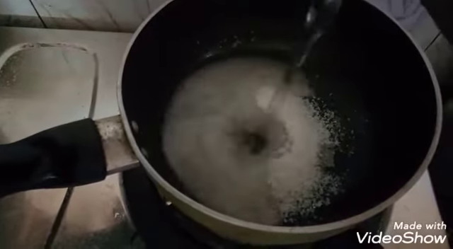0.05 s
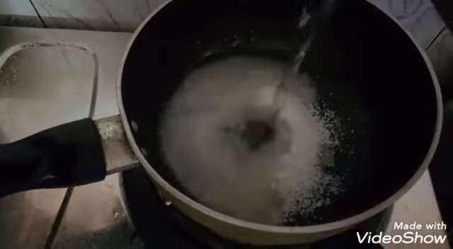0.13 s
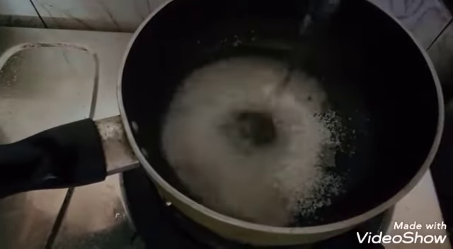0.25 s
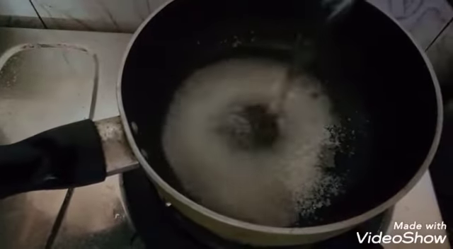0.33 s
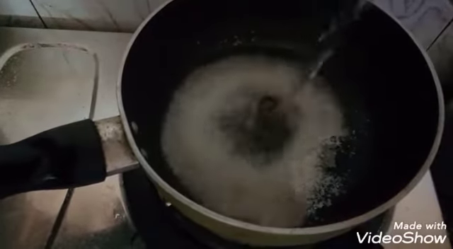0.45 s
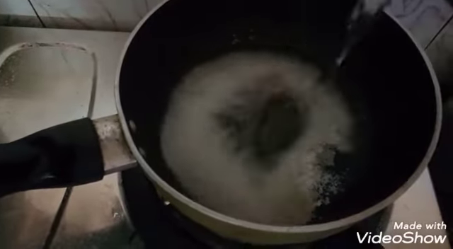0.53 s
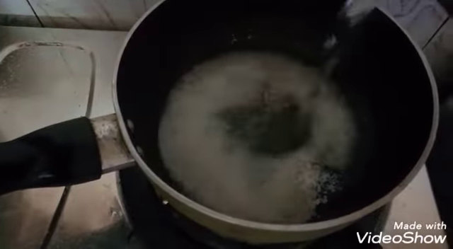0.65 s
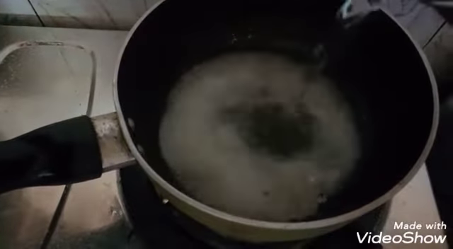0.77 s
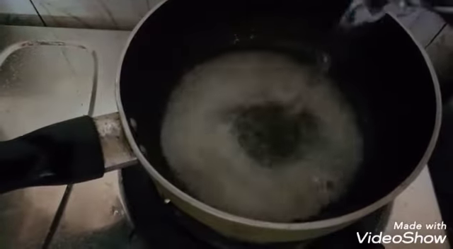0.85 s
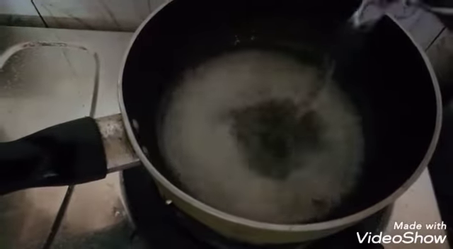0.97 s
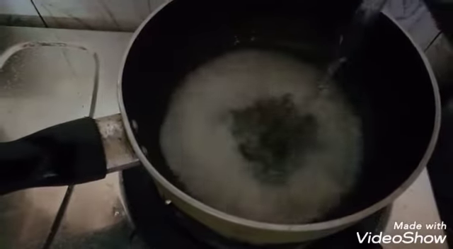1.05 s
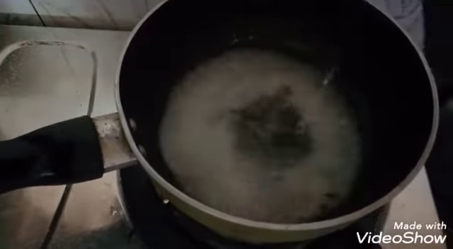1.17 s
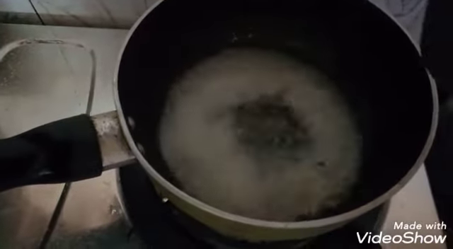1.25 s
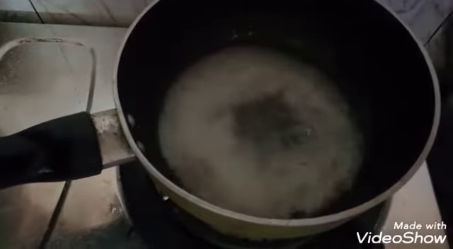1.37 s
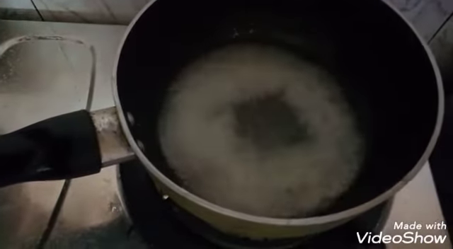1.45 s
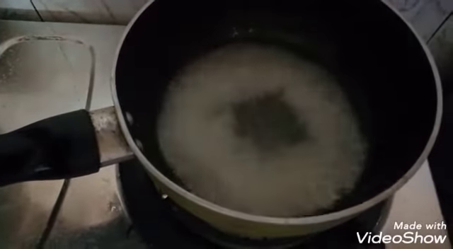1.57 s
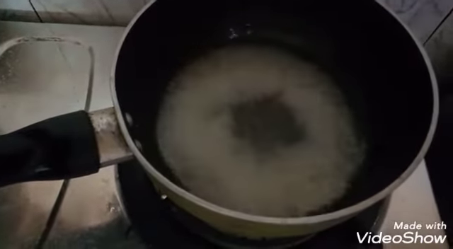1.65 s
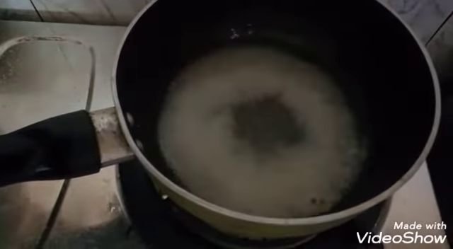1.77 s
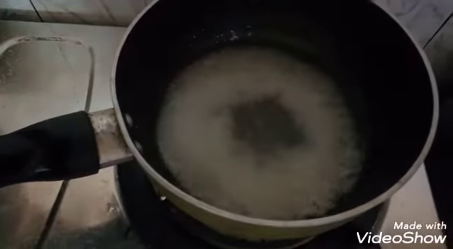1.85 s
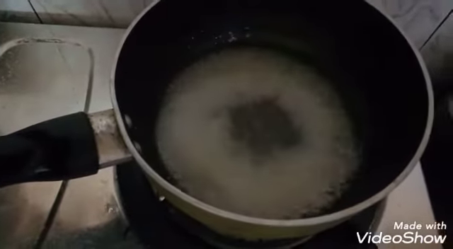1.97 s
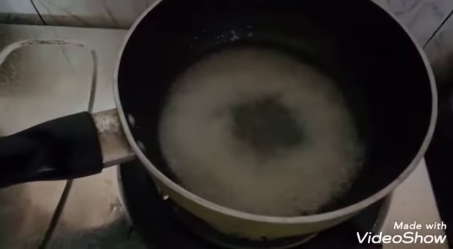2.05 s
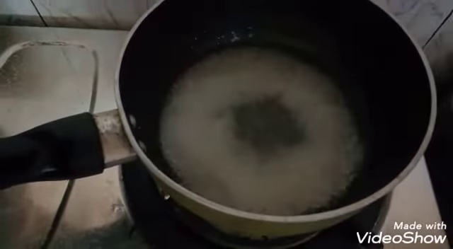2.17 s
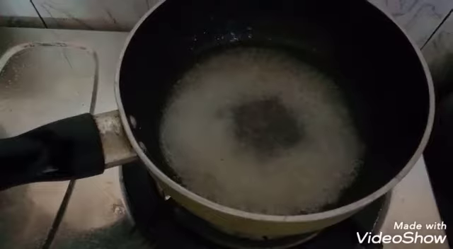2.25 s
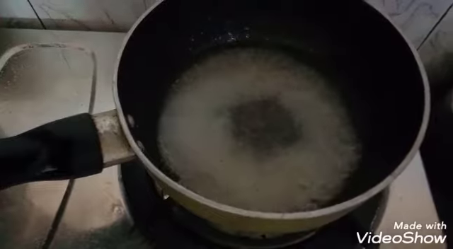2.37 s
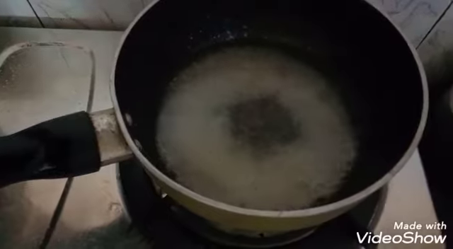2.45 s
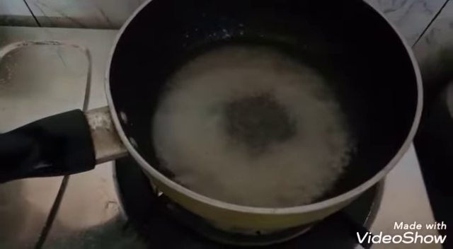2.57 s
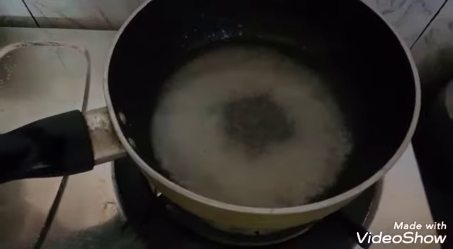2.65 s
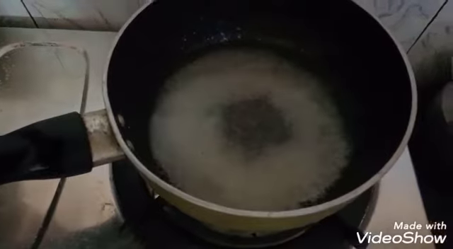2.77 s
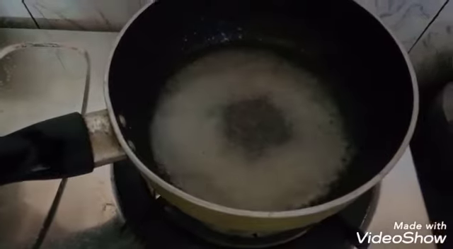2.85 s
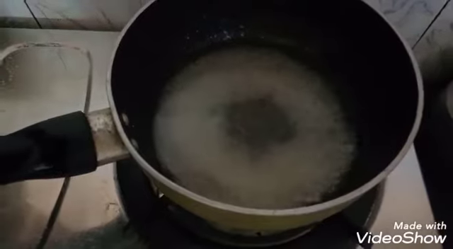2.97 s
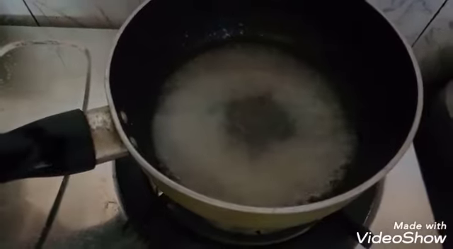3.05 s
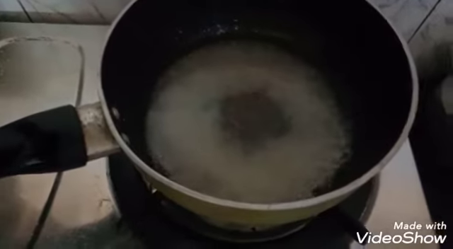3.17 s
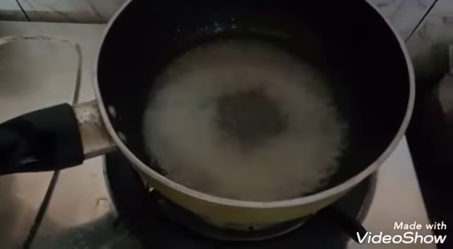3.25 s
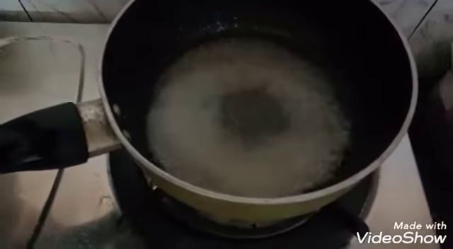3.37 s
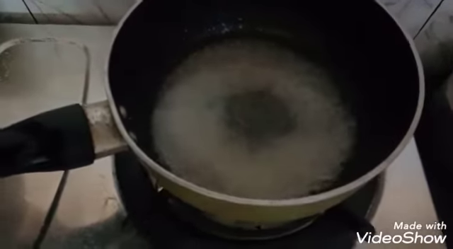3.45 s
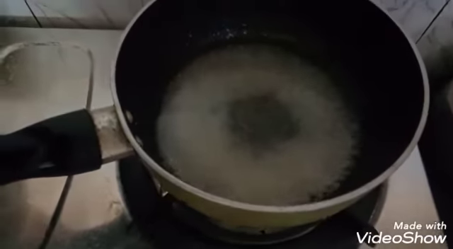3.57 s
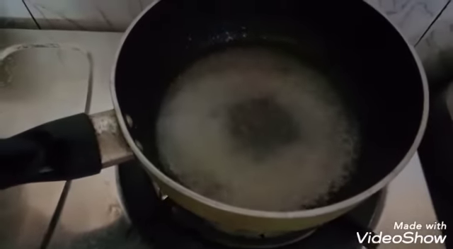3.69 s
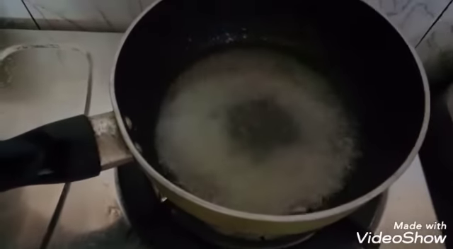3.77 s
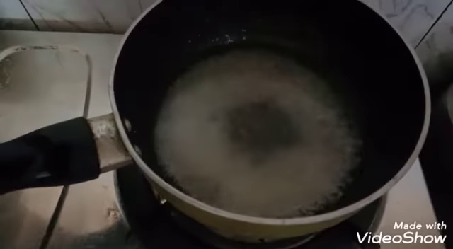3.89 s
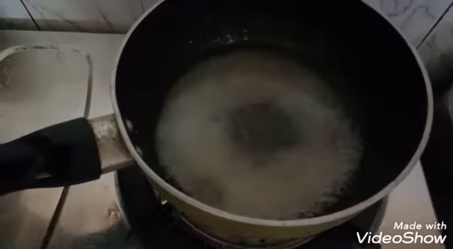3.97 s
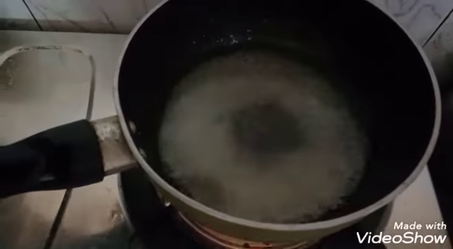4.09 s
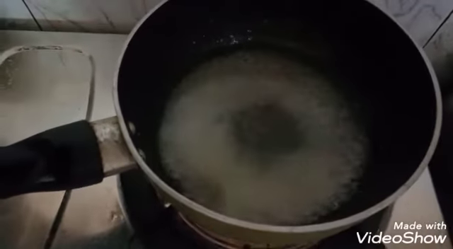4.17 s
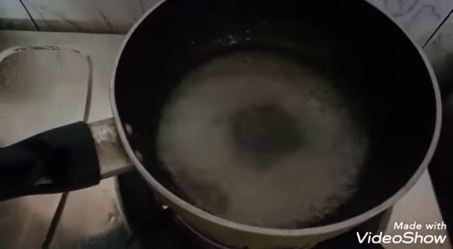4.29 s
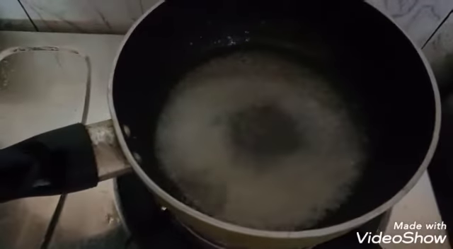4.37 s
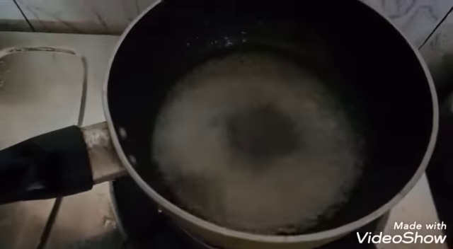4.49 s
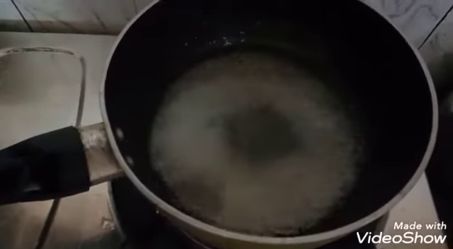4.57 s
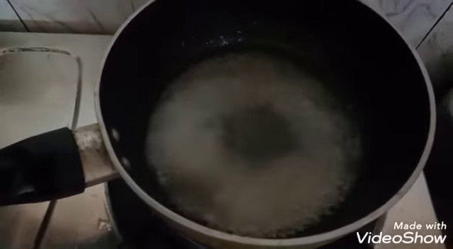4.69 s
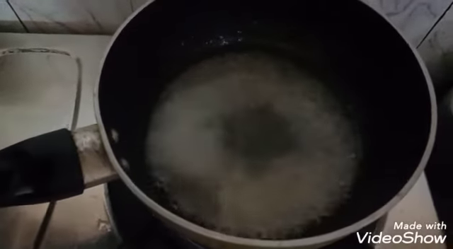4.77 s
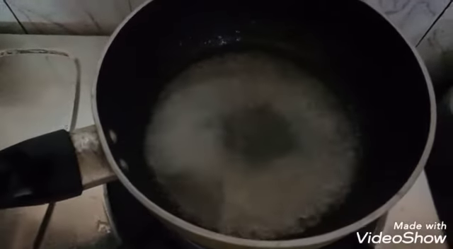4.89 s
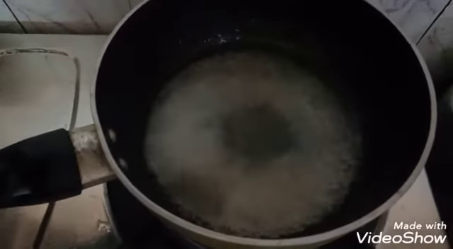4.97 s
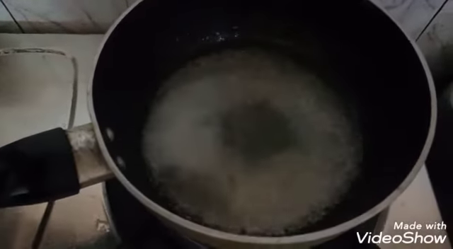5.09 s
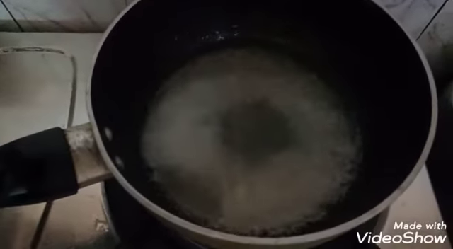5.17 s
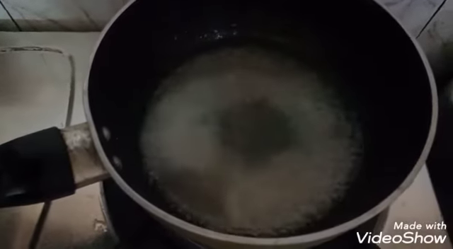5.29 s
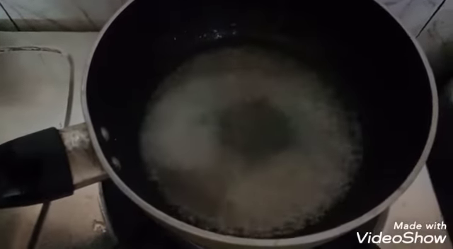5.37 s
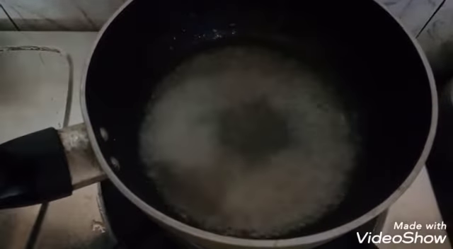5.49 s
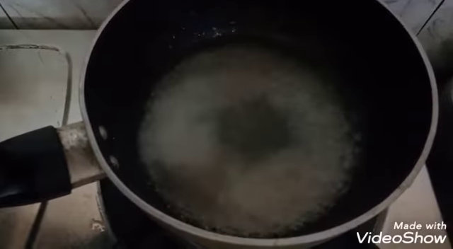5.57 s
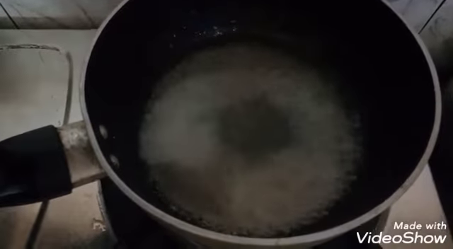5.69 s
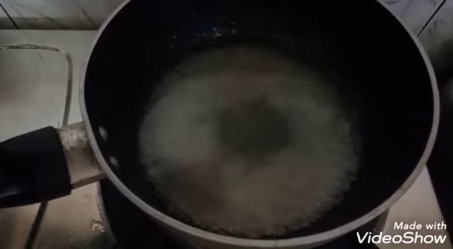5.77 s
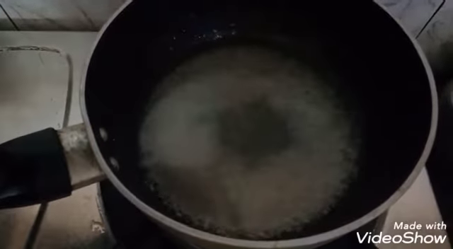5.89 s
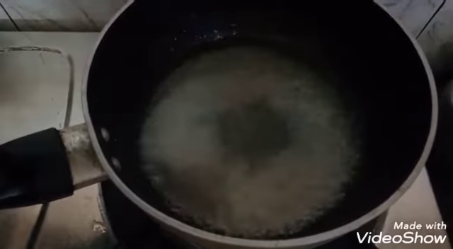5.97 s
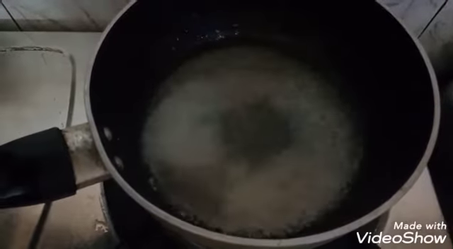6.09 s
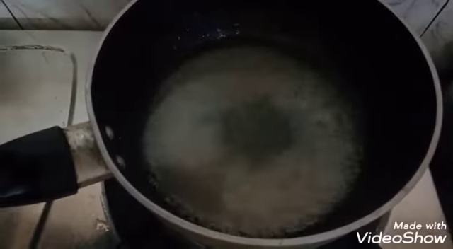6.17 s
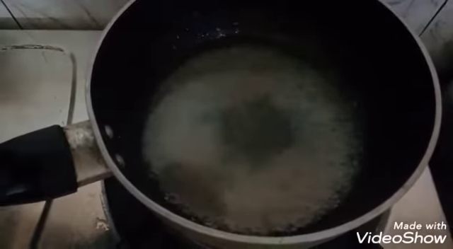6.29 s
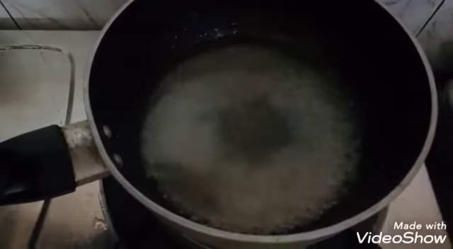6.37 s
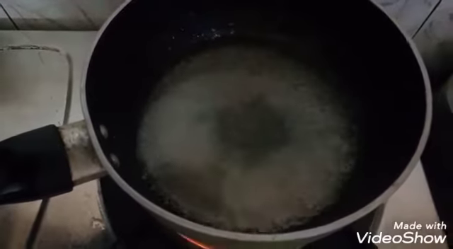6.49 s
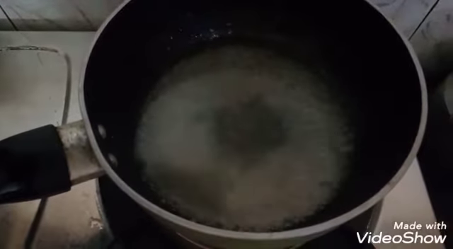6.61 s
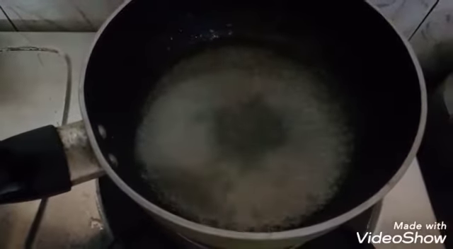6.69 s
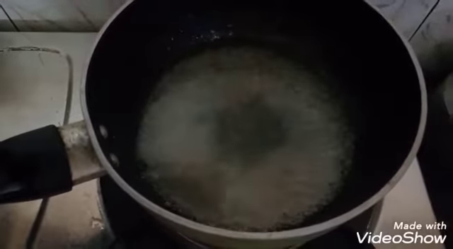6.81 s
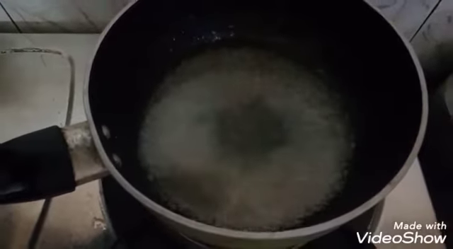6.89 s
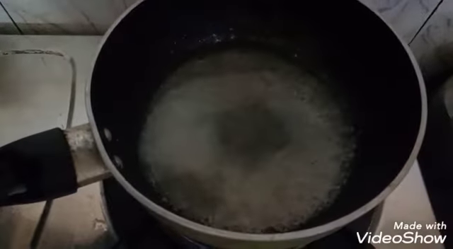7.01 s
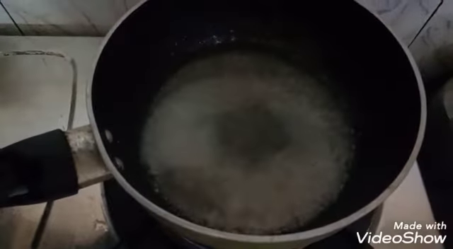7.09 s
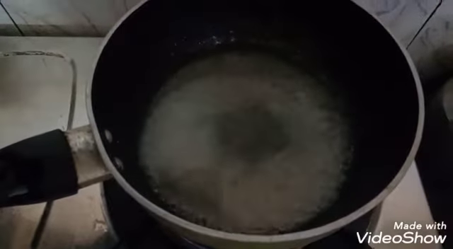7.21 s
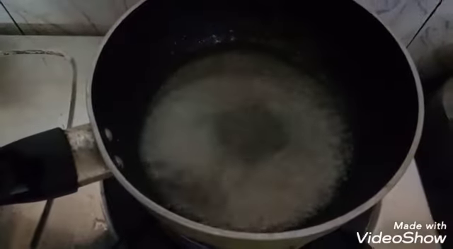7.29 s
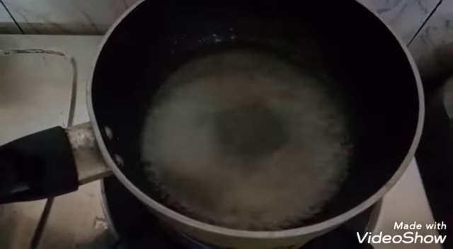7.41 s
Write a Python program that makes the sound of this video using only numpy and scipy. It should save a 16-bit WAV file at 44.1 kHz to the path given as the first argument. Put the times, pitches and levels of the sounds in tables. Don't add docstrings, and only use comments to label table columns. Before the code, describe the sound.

Water poured onto sugar in a hot steel pan hisses loudly with steam, then fades into clumpy crackling, sharp pops and spits.

```python
import sys
import numpy as np
from scipy import signal
from scipy.fft import rfft, irfft, next_fast_len
from scipy.io import wavfile
from scipy.ndimage import uniform_filter1d, map_coordinates

SR = 44100
rng = np.random.default_rng(int(sys.argv[2]) if len(sys.argv) > 2 else 0)


def convert_level_to_amplitude(level_db):
    exponent = np.asarray(level_db, float) / 20
    return 10 ** exponent


def waveform_to_disk(signal):
    frames = np.transpose(np.atleast_2d(signal))
    scaled = np.clip(frames, -1, 1) * 32767
    samples = np.round(scaled).astype(np.int16)
    wavfile.write(sys.argv[1], SR, samples)


N = 328545


def unit(x):
    return x / np.sqrt(np.mean(x ** 2) + 1e-20)


def along(points, hz):
    f, v = np.transpose(points)
    return np.interp(np.log(hz + 1), np.log(f + 1), v)


def curves(rows):
    s, *columns = np.transpose(rows)
    return [np.interp(np.arange(N) / SR, s, column) for column in columns]


def wobble(rate):
    return map_coordinates(rng.standard_normal(N // 50), [np.arange(N) * rate / SR])


def filtered(x, response):
    m = 2 * next_fast_len(N // 2 + SR // 4)
    return irfft(rfft(x, m) * response(np.fft.rfftfreq(m, 1 / SR)), m)[..., :N]


def coloured(x, spectrum):
    z = rfft(x)
    own = np.sqrt(uniform_filter1d(abs(z) ** 2, size=4000)) + 1e-9
    wanted = convert_level_to_amplitude(along(spectrum, np.fft.rfftfreq(N, 1 / SR)))
    return unit(irfft(z / own * wanted, N))


def patchy(depth_db):
    z = signal.stft(rng.standard_normal(N), nperseg=256)[2]
    field = uniform_filter1d(rng.standard_normal(z.shape), size=5, axis=0)
    field = uniform_filter1d(field, size=8, axis=1)
    return signal.istft(z * convert_level_to_amplitude(depth_db * unit(field)), nperseg=256)[1][:N]


def rings(s, gain, hz, t60, rise, size):
    t = np.arange(size) / SR
    s, gain, hz, t60 = (np.asarray(v)[:, None] for v in (s, gain, hz, t60))
    wave = gain * np.sin(2 * np.pi * hz * t) * convert_level_to_amplitude(-60 * t / t60) * (1 - np.exp(-t / rise))
    at = np.round(s * SR).astype(int) + np.arange(size)
    return np.bincount(at.ravel(), wave.ravel(), N + SR)[:N]


def bursts(s, gain, t60, rise, size):
    t = np.arange(size) / SR
    power = gain[:, None] ** 2 * convert_level_to_amplitude(-120 * t / t60[:, None]) * (1 - np.exp(-t / rise)) ** 2
    at = np.round(s * SR).astype(int)[:, None] + np.arange(size)
    return np.sqrt(np.bincount(at.ravel(), power.ravel(), N + SR)[:N])


def crowd(count, spread_db, top_db):
    when, first, second, loud = rng.random((count, 4)).T
    size_db = np.minimum(-spread_db * np.log(1 - loud), top_db)
    return when * N / SR, first, second, convert_level_to_amplitude(size_db)


def bubbles(count, low_hz, high_hz, cycles, spread_db, top_db, size):
    s, pitch, life, gain = crowd(count, spread_db, top_db)
    hz = low_hz * (high_hz / low_hz) ** pitch
    return rings(s, gain, hz, cycles * (.5 + life) / hz, 1e-4, size)


# (time [s], fizz level [dB])
BOIL_LEVEL = [(0, -19.5), (.25, -19.5), (.88, -22.5), (1.0, -24), (1.5, -25.5), (1.8, -26.5), (2.19, -27),
              (2.5, -29), (3.2, -30.5), (3.43, -30.5), (3.8, -33), (4.3, -35), (5.06, -33.5), (5.5, -35.5),
              (6.3, -36.5), (6.8, -37.5), (7.45, -36.5)]
# (time [s], grip on the pan over the fizz [dB], churn over the pan [dB])
POOL_LEVELS = [(0, -17, -12.5), (.46, -15.5, -10), (.6, -9.5, -14.5), (.8, -9, -15), (.95, -7.5, -13),
               (1.13, -6.5, -11), (1.5, -6, -12), (2.1, -6.5, -13.5), (2.6, -7, -12), (3.3, -8, -18),
               (4.0, -7, -16.5), (4.3, -5.5, -21), (4.45, -8, -16), (6.75, -8.5, -18.5), (7.05, -11, -11),
               (7.45, -10.5, -15)]
# (time [s], level change [dB])
LEVEL_SURGES = [(.082, 1.5), (.125, -2), (.19, 1), (.24, -3), (1.22, -2.5), (1.3, 2), (1.584, -5),
                (2.402, -5), (2.666, 3), (2.72, -5), (3.098, 3), (3.594, 2), (3.637, 2.5), (4.427, -0.5),
                (4.522, 4.5), (4.612, 3.5), (4.652, -7.5), (4.956, -0.5), (5.425, 0), (5.488, 1),
                (5.615, -0.5), (5.662, 3.5), (6.168, 1.5), (6.223, -2), (6.513, 4.5)]
SURGE_S, UNREST_DB = 0.013, 0.64
PAN_FEELS = 0.67


def effort():
    t = np.arange(N) / SR
    surge_db = UNREST_DB * wobble(8.1)
    for s, db in LEVEL_SURGES:
        surge_db = surge_db + db * np.exp(-.5 * ((t - s) / SURGE_S) ** 2)
    boil_db = curves(BOIL_LEVEL)[0]
    grip_db, churn_db = curves(POOL_LEVELS)
    shake_db = boil_db + grip_db + PAN_FEELS * surge_db
    return boil_db + surge_db, shake_db, shake_db + churn_db


# (time [s], share [0-1])
CRACKLE_SHARE = [(0, 0), (1.5, 0.4), (3, 0.64), (5, 0.76), (7.45, 0.7)]
# (frequency [Hz], level [dB per Hz])
FIZZ_COLOUR = [(3000, -9), (4000, -9), (4800, -10.5), (5500, -4), (6500, -4.5), (8000, -5), (10500, -7.5),
               (11800, -14), (13500, -14), (15600, -17)]
# (frequency [Hz], level [dB per Hz])
STEAM_COLOUR = [(3000, -15.5), (4000, -14.5), (4800, -13), (5500, -7), (6500, -6.5), (8000, -6.5),
                (10500, -7), (11800, -10.5), (13000, -13.5), (14300, -13), (15600, -16)]


def boil(fizz_db, shake_db):
    share = np.clip(curves(CRACKLE_SHARE)[0], 0, 1)
    clump = np.clip(0.83 * wobble(20) + wobble(60) + wobble(170), -3.5, 3)
    steam = filtered(coloured(patchy(depth_db=1.0), STEAM_COLOUR), air_path)
    steam = unit(convert_level_to_amplitude(0.15 * clump) * steam)

    ringing = bubbles(count=12000, low_hz=3100, high_hz=15300, cycles=44, spread_db=2.5, top_db=8, size=240)
    s, life, _, gain = crowd(count=2500, spread_db=0.5, top_db=14.5)
    spits = bursts(s, gain, 0.0019 + 0.011 * life, 5e-5, size=500)
    spray = unit(spits * coloured(rng.standard_normal(N), FIZZ_COLOUR))
    crackle = filtered(coloured(ringing, FIZZ_COLOUR) + 0.8 * spray, air_path)
    crackle = unit(convert_level_to_amplitude(1.12 * clump) * crackle)
    fizz = convert_level_to_amplitude(fizz_db - 0.57) * (np.sqrt(1 - share) * steam + np.sqrt(share) * crackle)

    glug = bubbles(count=5000, low_hz=680, high_hz=4430, cycles=10, spread_db=0.0, top_db=7.5, size=400)
    drive = unit(patchy(depth_db=1.5)) + 0.31 * unit(glug) + .4 * unit(spits * rng.standard_normal(N))
    pan = unit(filtered(convert_level_to_amplitude(0.31 * clump) * drive, pan_body))
    return fizz + convert_level_to_amplitude(shake_db + 0.69) * pan


# (time [s], peak level [dB], pitch [Hz])
DULL_POPS = [(1.6621, -19, 6830), (1.8485, -18, 7000), (2.081, -16, 6740), (2.5295, -10, 6900),
             (2.6635, -15, 7040), (4.4337, -18, 6900), (4.479, -11.5, 6230), (4.606, -21, 6850),
             (4.759, -11.5, 7270), (4.954, -12, 9600), (5.038, -18, 6850), (5.072, -13.5, 6960),
             (5.196, -18, 6330), (5.369, -18, 7100), (5.6486, -14, 6650), (5.788, -18, 7130),
             (5.9386, -14.5, 7040), (6.0347, -15.5, 7100), (6.2936, -12, 7000), (6.297, -12, 6900),
             (6.39, -16, 7190), (6.437, -16, 6850), (6.5123, -12, 6640), (6.6246, -18, 5920),
             (6.642, -14.5, 5770), (6.7024, -9, 7000), (6.828, -15, 6950), (6.951, -20, 5970),
             (7.1977, -15.5, 7000), (7.371, -17.5, 6750)]
# (time [s], peak level [dB], pitch [Hz])
BRIGHT_POPS = [(1.4565, -8, 6050), (2.2615, -12, 10100), (2.3603, -22, 6760), (2.4234, -14, 6930),
               (2.4663, -15, 6440), (2.6216, -10, 6890), (2.949, -11, 7050), (3.1192, -11.5, 5940),
               (3.201, -12, 7800), (3.5046, -13, 6570), (3.5658, -13, 6700), (3.902, -15, 10060),
               (4.031, -13.5, 10300), (4.2617, -17, 8500), (4.292, -13, 6700), (4.3505, -12, 6800),
               (4.3854, -12.5, 9190), (4.4608, -15, 8450), (4.5418, -16.5, 7160), (4.6438, -17, 9350),
               (5.2484, -17, 9500), (5.567, -12, 9900), (5.6162, -16, 9110), (6.0157, -19, 7060),
               (6.589, -16, 7700), (6.8895, -23, 7500), (7.149, -16.5, 7040), (7.2188, -11.5, 6850),
               (7.269, -19, 6500), (7.4446, -16, 8610)]
DULL_SNAP_DB, BRIGHT_SNAP_DB = -11, 2
SMALL_FROM_S, SMALL_OVER_DB, SMALL_SPREAD_DB = 1.2, 12, -2
SMALL_LOW_HZ, SMALL_HIGH_HZ = 6230, 9700


def pop_rows(count):
    when, size, pitch, skin = rng.random((count, 4)).T
    s = SMALL_FROM_S + when * (N / SR - SMALL_FROM_S)
    db = np.interp(s, *np.transpose(BOIL_LEVEL)) + SMALL_OVER_DB + SMALL_SPREAD_DB * (size ** 2 - .5)
    hz = SMALL_LOW_HZ * (SMALL_HIGH_HZ / SMALL_LOW_HZ) ** pitch ** 2
    small = np.c_[s, db, hz, -9 * skin]
    dull = [(*row, DULL_SNAP_DB) for row in DULL_POPS]
    bright = [(*row, BRIGHT_SNAP_DB) for row in BRIGHT_POPS]
    return np.r_[dull + bright, small].T


# (time [s], peak level [dB], pitch [Hz], t60 [s])
PINGS = [
    (5.251, -19.5, 2970, 0.0057),
    (5.2584, -27, 3200, 0.0071),
    (6.7156, -38, 3000, 0.012),
    (7.3048, -42, 2870, 0.012),
         (4.2804, -32, 5940, 0.014),
    (4.317, -21, 4700, 0.0046),
    (4.584, -28, 5930, 0.011),
]


def pops():
    s, db, hz, snap_db = pop_rows(count=90)
    t60 = 0.0069 * convert_level_to_amplitude(-.5 * (snap_db - 2.0))
    tone = rings(s, convert_level_to_amplitude(db - 5.5), hz, 0.85 * t60, 0.00024, size=600)

    skin_hz = 8000 + 3000 * rng.random(len(s))
    snap = rings(s, convert_level_to_amplitude(db + .5 * snap_db + 1), skin_hz, np.full(len(s), 0.002), 3e-5, size=150)
    snap = filtered(snap, lambda f: air_path(f) * (1j * f / (5600 + 1j * f)) ** 2)

    droplets = unit(filtered(coloured(rng.standard_normal(N), FIZZ_COLOUR), air_path))
    droplets = droplets / np.sqrt(abs(uniform_filter1d(droplets ** 2, size=40)) + .1)
    spray = bursts(s, convert_level_to_amplitude(db + 0.21 * snap_db - 8), 0.7 * t60, 6e-5, size=600) * droplets

    pan_noise = unit(filtered(rng.standard_normal(N), pan_body))
    knock = bursts(s, convert_level_to_amplitude(db - 27.0), 0.86 * t60, 0.000066, size=600) * pan_noise

    s, db, hz, t60 = np.transpose(PINGS)
    pings = rings(s, convert_level_to_amplitude(db + 8.5), hz, t60, 0.00041, size=1500)
    return walls(tone + snap + spray + knock + pings, t60=.05, wet_db=-9)


TICK_OVER_DB, TICK_GROWS_DB, TICK_LOW_HZ = 15.5, 3.5, 6500


def ticks(fizz_db):
    s, sign, _, gain = crowd(count=420, spread_db=3.5, top_db=11)
    at = (s * SR).astype(int)
    level_db = fizz_db[at] + TICK_OVER_DB + TICK_GROWS_DB * (at / N - 1.5)
    clicks = np.bincount(at, gain * np.sign(sign - .5) * convert_level_to_amplitude(level_db), N)
    clicks = filtered(clicks, lambda f: air_path(f) * (1j * f / (TICK_LOW_HZ + 1j * f)) ** 2)
    return walls(clicks, t60=0.011, wet_db=-6)


PAN_MODE_HZ = [608, 850, 905, 1010, 1110, 1180, 1320, 1420, 1640, 1810, 2060, 2180, 2530, 2610, 2740, 2880,
               3080, 3200, 3510, 3850, 4340, 4800]
# (width [Hz], level [dB])
PAN_MODES = [(31.2, -15), (55, -8.5), (28.1, -6), (43.4, -8.5), (51, -4.5), (77, -6.5), (58, -9),
             (120, -11.5), (147, -6.5), (170, -1.5), (90.5, -6.5), (165, -12.5), (154, -5), (75.6, -3.5),
             (81.4, -3), (95, -4), (89, -6), (125, -7.5), (171, -4.5), (284, -12.5), (204, -8), (121, -8.5)]


def pan_body(hz):
    power = 0
    for centre, (width, db) in zip(PAN_MODE_HZ, PAN_MODES):
        damping = (hz * width) ** 2
        detuning = (centre * centre - hz * hz) ** 4 / (centre * width) ** 2
        power = power + convert_level_to_amplitude(2 * db) * damping / (detuning + damping)
    cepstrum = irfft(np.log(power + 1e-9) / 2)
    half = len(cepstrum) // 2
    fold = np.r_[1, np.full(half - 1, 2)]
    return np.exp(rfft(cepstrum[:half] * fold, len(cepstrum)))


def walls(x, t60, wet_db):
    tail = rng.standard_normal(2000) * convert_level_to_amplitude(-60 * np.arange(2000) / SR / t60)
    echo = signal.fftconvolve(np.pad(x, (30, 0)), tail / np.linalg.norm(tail))[:N]
    return x + convert_level_to_amplitude(wet_db) * echo


# (frequency [Hz], width [Hz], level [dB])
AIR_LIFTS = [
    (6050, 70, -5.5),
    (6850, 830, 2.5),
    (8500, 110, -8),
    (9540, 860, -5.5),
]


def air_path(hz):
    lifts = 1
    for centre, width, db in AIR_LIFTS:
        band = 1j * hz * width
        lifts = lifts + convert_level_to_amplitude(db) * band / (centre * centre - hz * hz + band)
    return lifts / np.sqrt(1 + (2700 / (hz + 1)) ** 7)


DREGS_S, DREGS_LAST_S, DREGS_DB, DREGS_HZ, DREGS_WIDE_HZ = 1.26, 0.21, -38.5, 1080, 250


def dregs():
    t = np.arange(N) / SR
    swell = np.exp(-.5 * ((t - DREGS_S) / DREGS_LAST_S) ** 4) * convert_level_to_amplitude(2.3 * wobble(30.3))

    def low_modes(hz):
        return pan_body(hz) * np.exp(-.5 * ((hz - DREGS_HZ) / DREGS_WIDE_HZ) ** 2)

    return convert_level_to_amplitude(DREGS_DB) * swell * unit(filtered(rng.standard_normal(N), low_modes))


# (time [s], peak level [dB], thud level [dB])
CUP_CONTACTS = [
    (2.565, -20, -12),
    (2.572, -12, -13),
    (2.609, -6, -23),
]
# (frequency [Hz], level [dB], t60 [s])
RIM_MODES = [
    (3420, -13, 0.083),
    (5200, -17, 0.24),
    (5940, -10, 0.081),
    (7450, -4.5, 0.1),
]
CUP_BODY_HZ = [1388, 1407, 1433, 1461, 1504, 1526, 1568]
# (level [dB], t60 [s])
CUP_BODY = [(-1, 0.34), (9.5, 0.22), (-4, 0.25), (1, 0.48), (-21, 0.17), (1, 0.14), (0, .08)]


def cup():
    (land, _, _), (drop, drop_db, thud_db), (rock, rock_db, _) = CUP_CONTACTS
    hz, level_db, t60 = np.transpose(RIM_MODES)
    rim = rings(0 * hz + land, convert_level_to_amplitude(drop_db + level_db - 2.5), hz, t60, 0.0017, size=SR // 4)
    level_db, t60 = np.transpose(CUP_BODY)
    body = rings(0 * t60 + drop, convert_level_to_amplitude(drop_db + level_db - 15.5), CUP_BODY_HZ, t60, 0.0017, size=SR // 3)
    again = rings([rock], convert_level_to_amplitude([rock_db - 6.5]), [1445], [.07], 0.0055, size=SR // 4)
    thud_gain = convert_level_to_amplitude(drop_db + thud_db + np.array([6.5, 2.5, -6.0, -8.5]))
    thud_hz, thud_t60 = [453, 726, 620, 154], [0.027, 0.069, 0.17, 0.051]
    thud = rings([land, land, drop, drop], thud_gain, thud_hz, thud_t60, 0.0035, size=SR // 4)
    return rim + body + again + thud


# (time [s], peak level [dB], pitch [Hz], boom level [dB])
WORKTOP_THUMPS = [(3.549, -46.5, 430, -71), (3.806, -44, 464, -72), (4.149, -50, 234, -53),
                  (4.503, -57, 186, -74), (4.596, -54, 188, -64), (4.669, -54, 132, -48.5),
                  (5.057, -54, 386, -65), (5.201, -49, 137, -52), (5.272, -53, 142, -52),
                  (5.348, -60, 390, -55.5), (5.574, -51, 330, -51), (5.708, -49, 315, -57),
                  (5.842, -50.5, 131, -62), (5.982, -53, 345, -59), (6.1, -53, 394, -67),
                  (6.219, -52, 130, -78), (6.45, -49, 137, -74), (6.647, -52, 132, -57),
                  (6.925, -58, 144, -58), (7.051, -44, 193, -41), (7.121, -49, 132, -58),
                  (7.182, -44, 329, -64), (7.326, -51, 313, -64)]
# (delay [s], level [dB], pitch ratio)
THUMP_PARTS = [
    (0, 8.5, 0.99),
    (.004, 0.5, .55),
    (.011, 4.5, 1.25),
    (0.029, 1, 0.68),
    (0.036, -5, 1.13),
]
# frequency [Hz], t60 [s], rise [s]
WORKTOP_BOOM = (98, 0.38, 0.04)


def thumps():
    s, db, hz, boom_db = np.transpose(WORKTOP_THUMPS)
    boom_hz, boom_t60, rise = WORKTOP_BOOM
    puff = 0
    for lag, level_db, ratio in THUMP_PARTS:
        puff = puff + rings(s + lag, convert_level_to_amplitude(db + level_db), ratio * hz, 0 * s + 0.057, 0.0028, size=SR // 8)
    boom = rings(s, convert_level_to_amplitude(boom_db + 6.5), 0 * s + boom_hz, 0 * s + boom_t60, rise, size=SR // 3)
    return puff + boom


# (frequency [Hz], level [dB per Hz])
GURGLE_COLOUR = [(250, -31), (380, -6), (470, -2.5), (560, -0.5), (610, 5.5), (660, -3), (760, 1.5),
                 (1000, -12), (1450, -8), (2300, -4.5), (3200, -30), (4500, -54)]
# (frequency [Hz], level [dB per Hz])
RUMBLE_COLOUR = [(12, -39), (20, -5), (113, -4), (145, -4), (254, -5), (329, -4.5), (450, -8.5), (580, -38),
                 (990, -120)]
FLARE_DB, FLAME_DB, FLARE_FADE_S = -48.5, -65, 2.05


def pool(gurgle_db):
    flare = np.exp(-np.arange(N) / SR / FLARE_FADE_S)
    rumble_db = FLAME_DB + (FLARE_DB - FLAME_DB) * flare + 1.25 + 1.3 * wobble(9.3)
    gurgle = convert_level_to_amplitude(gurgle_db + 2.5) * coloured(patchy(depth_db=2.0), GURGLE_COLOUR)
    rumble = convert_level_to_amplitude(rumble_db) * coloured(patchy(depth_db=1.5), RUMBLE_COLOUR)
    return gurgle + rumble


def scene():
    fizz_db, shake_db, gurgle_db = effort()
    water = boil(fizz_db, shake_db) + pops() + ticks(fizz_db) + dregs() + pool(gurgle_db)
    return np.tile(water + cup() + thumps(), (2, 1))


def roll_off(x):
    return signal.sosfilt(signal.butter(12, 15690, fs=SR, output="sos"), x)


CLIP_TOP, CLIP_HARD, MIC_TOP_HZ = 0.41, 6.1, 15560


def record(dry):
    dry = dry / (1 + abs(dry / CLIP_TOP) ** CLIP_HARD) ** (1 / CLIP_HARD)
    trace = convert_level_to_amplitude(-35.5) * dry[0] * wobble(800)
    pair = dry + np.array([trace, -trace])
    mix = filtered(pair, lambda hz: 1 / (1 + (hz / MIC_TOP_HZ) ** 90))
    return roll_off(mix)


dry = scene()
out = record(dry)
waveform_to_disk(out)
```